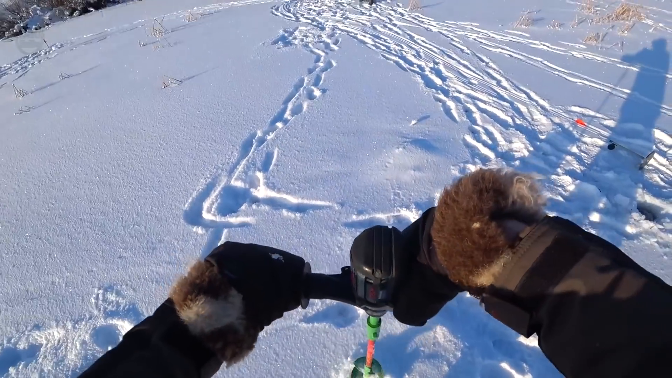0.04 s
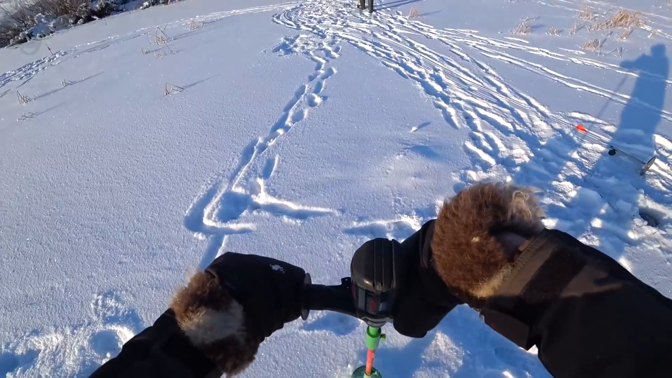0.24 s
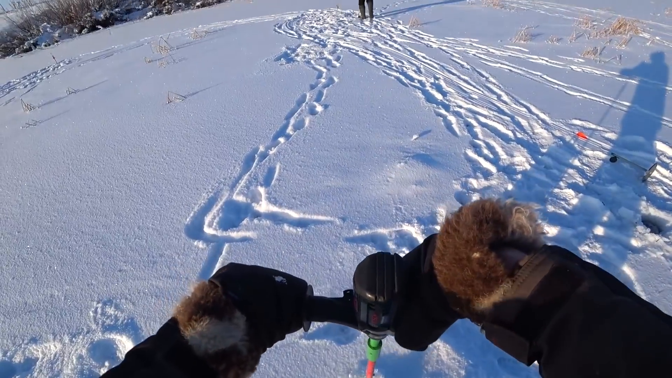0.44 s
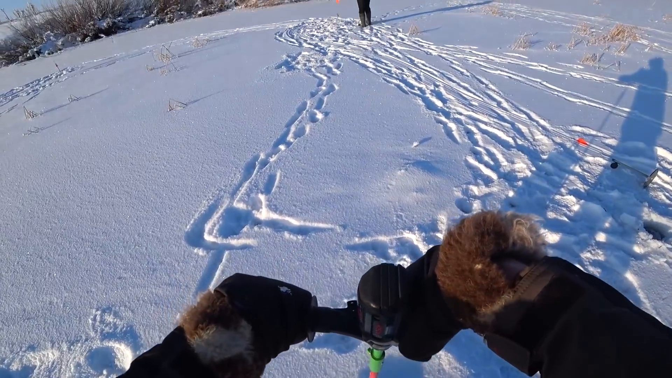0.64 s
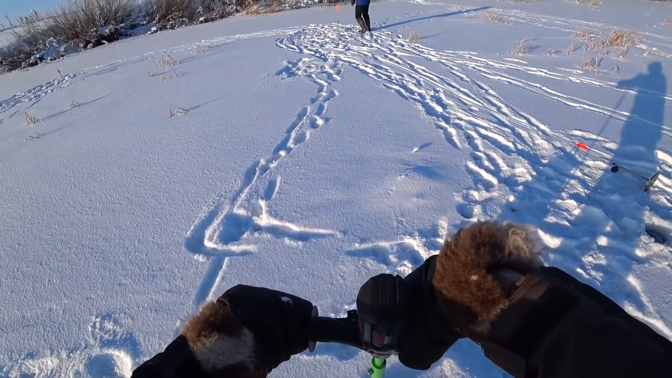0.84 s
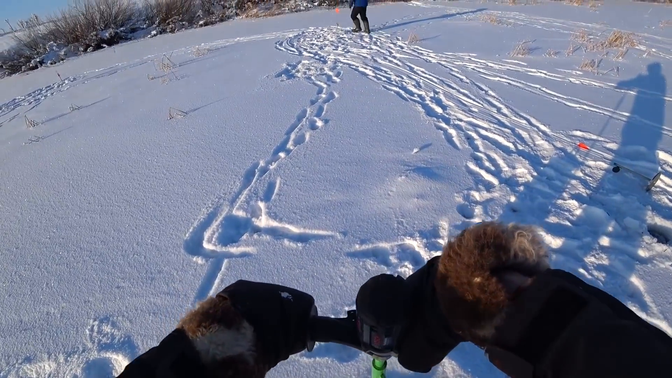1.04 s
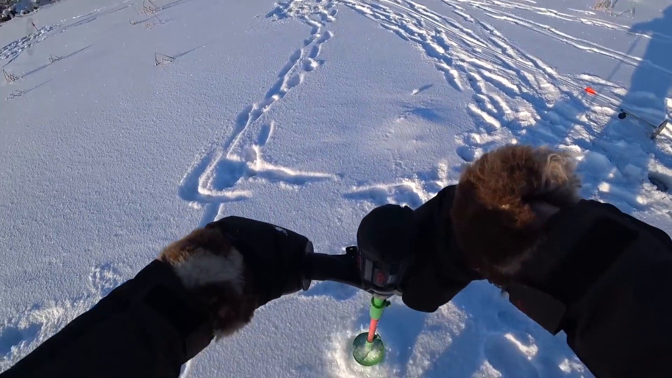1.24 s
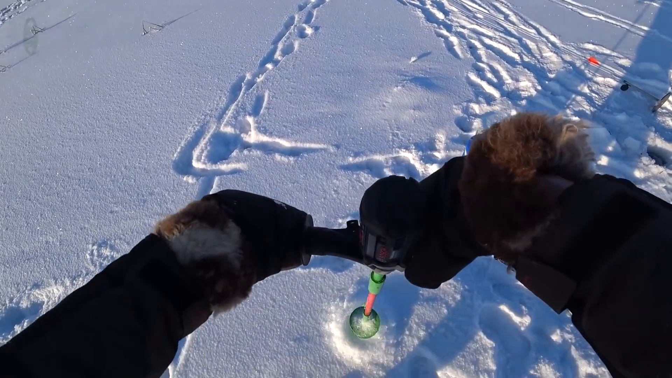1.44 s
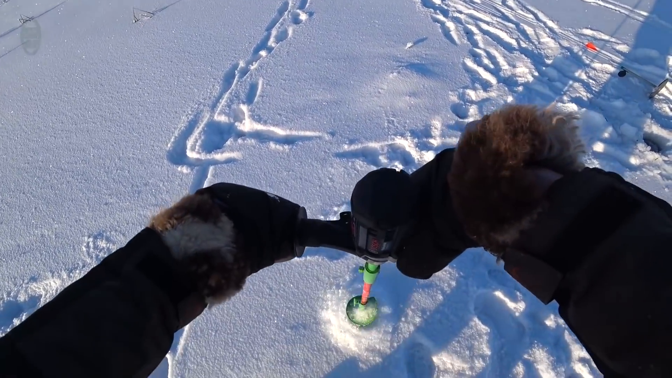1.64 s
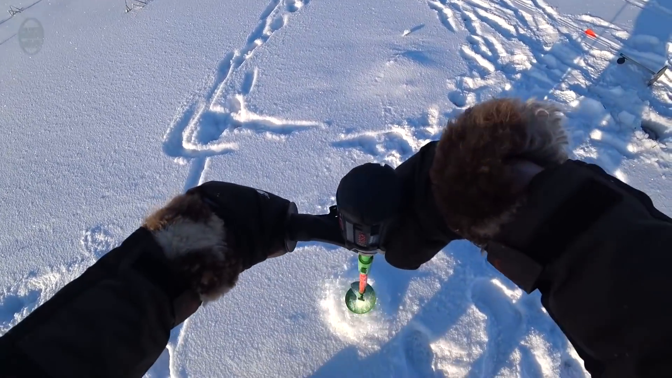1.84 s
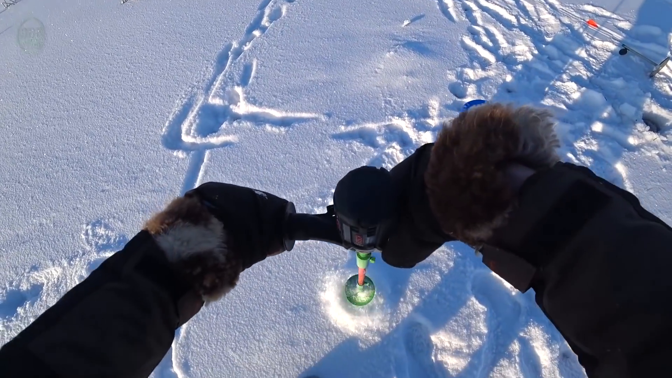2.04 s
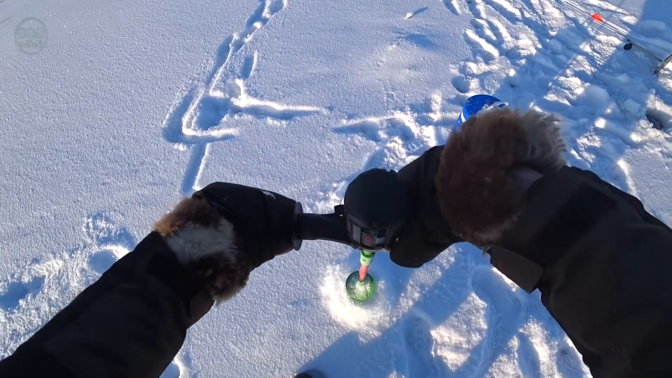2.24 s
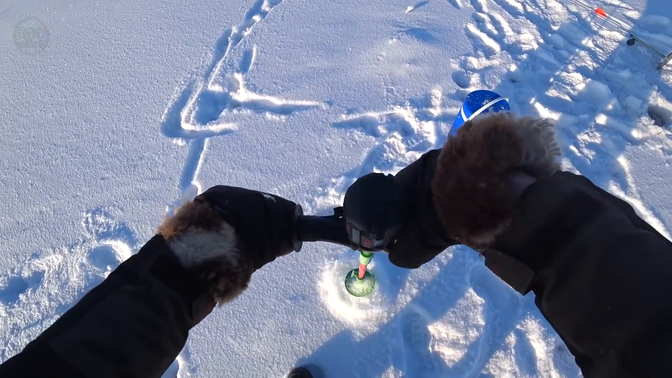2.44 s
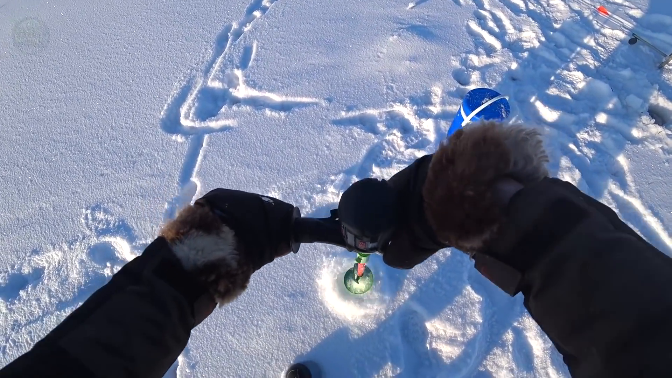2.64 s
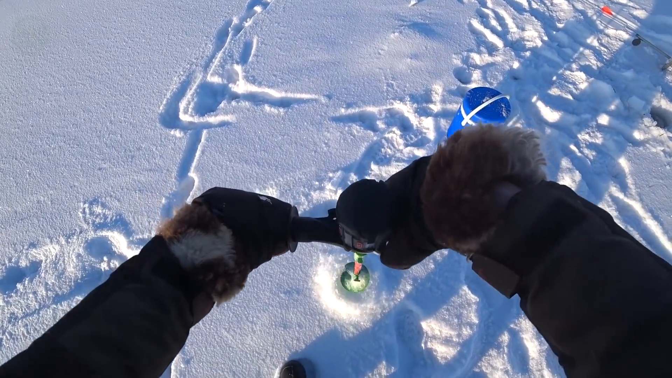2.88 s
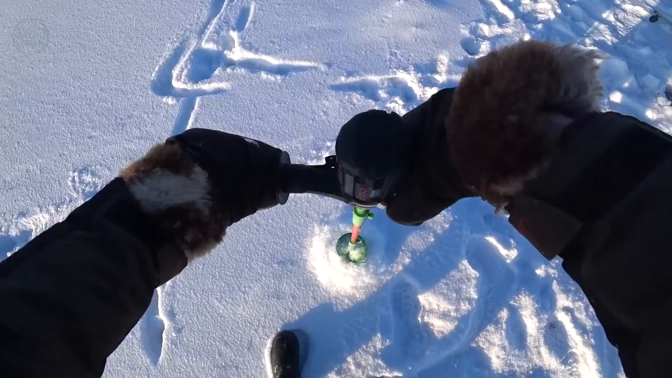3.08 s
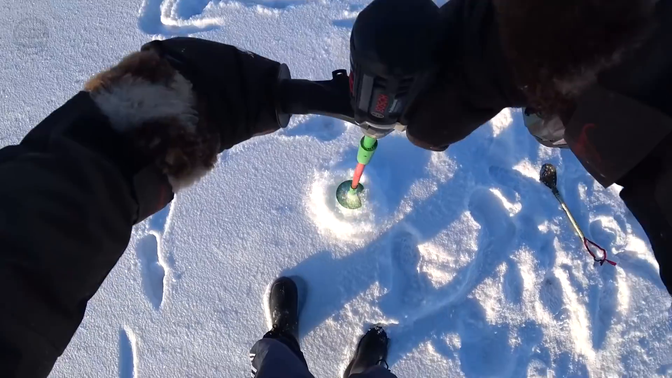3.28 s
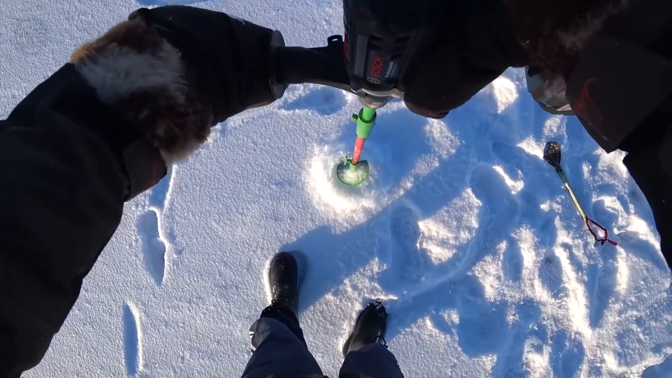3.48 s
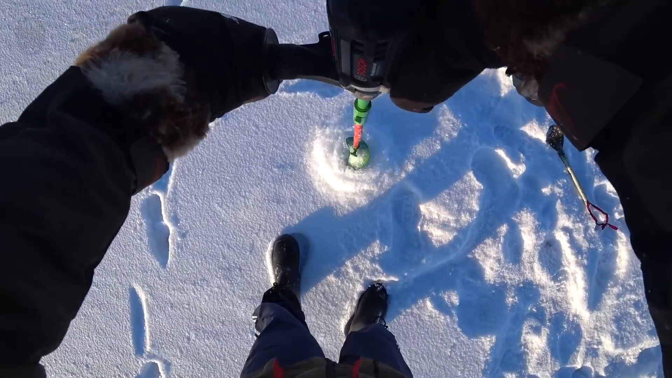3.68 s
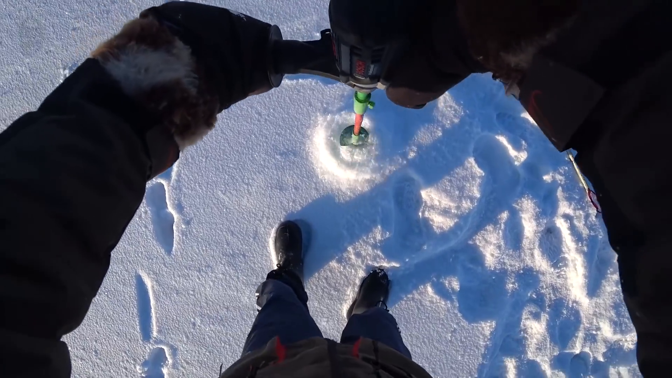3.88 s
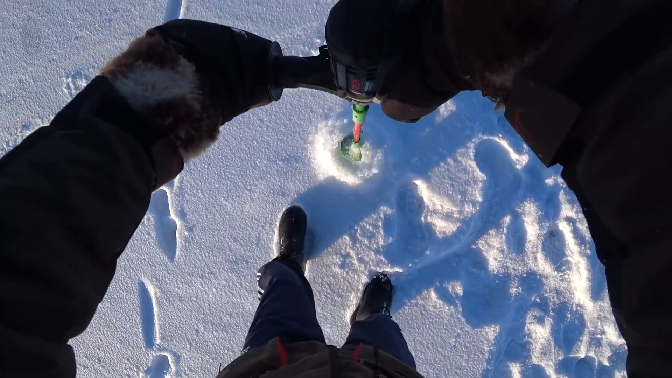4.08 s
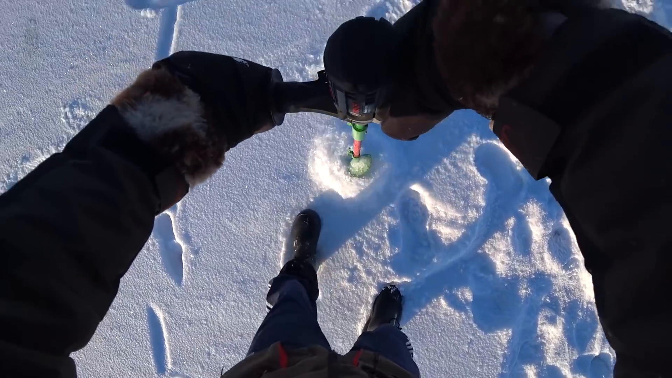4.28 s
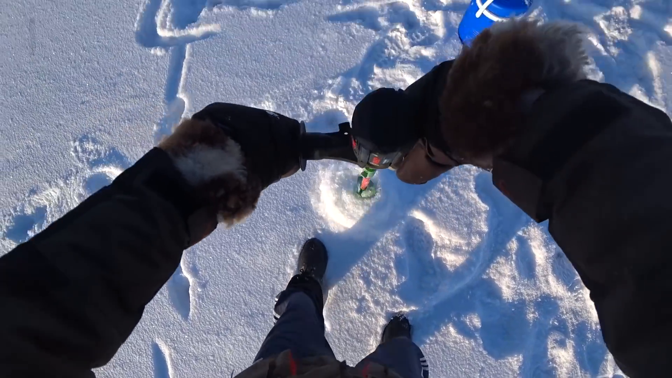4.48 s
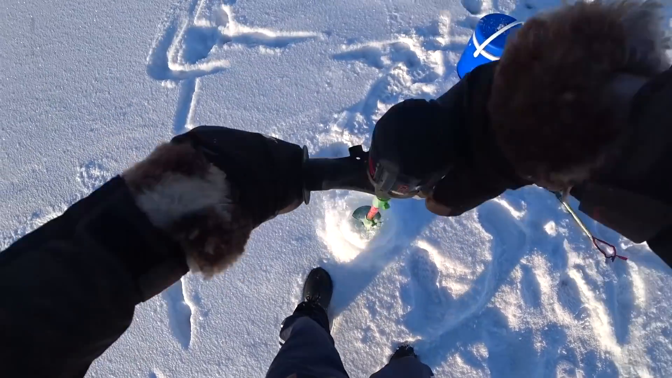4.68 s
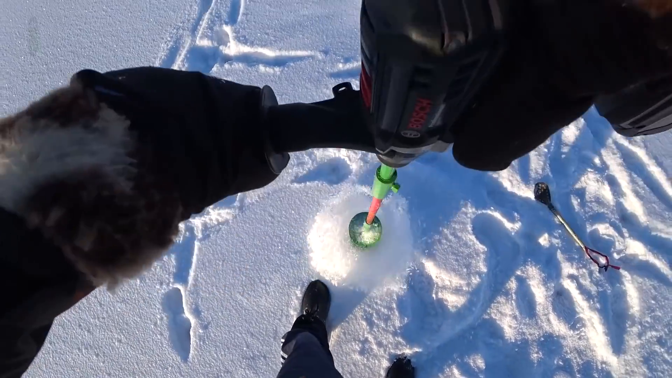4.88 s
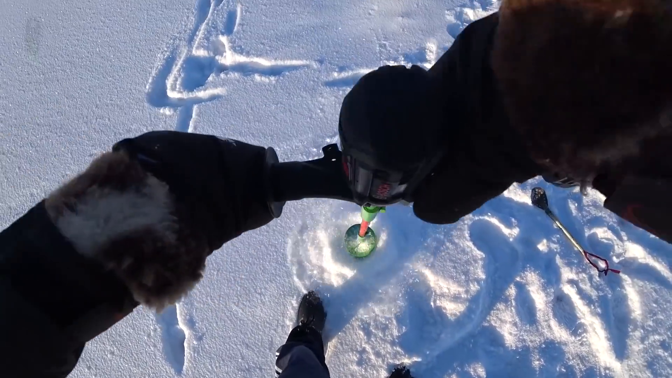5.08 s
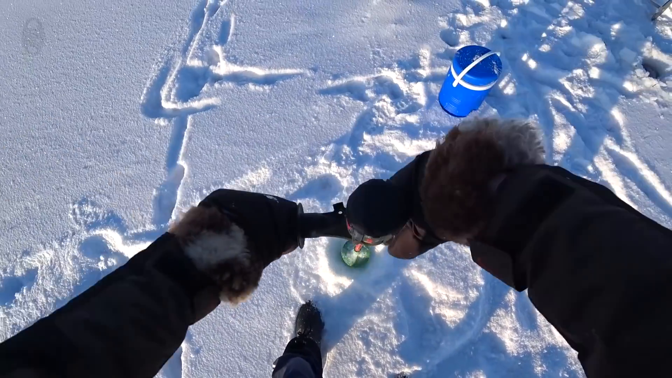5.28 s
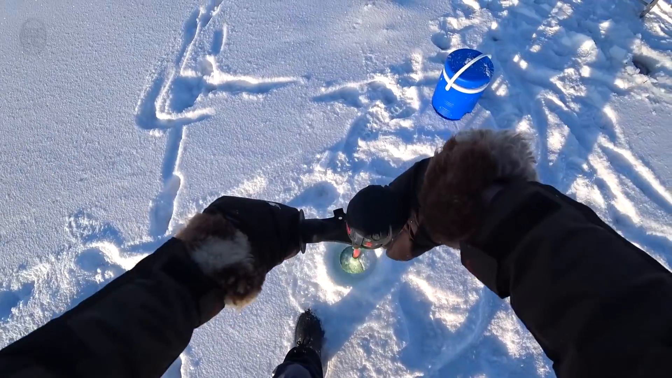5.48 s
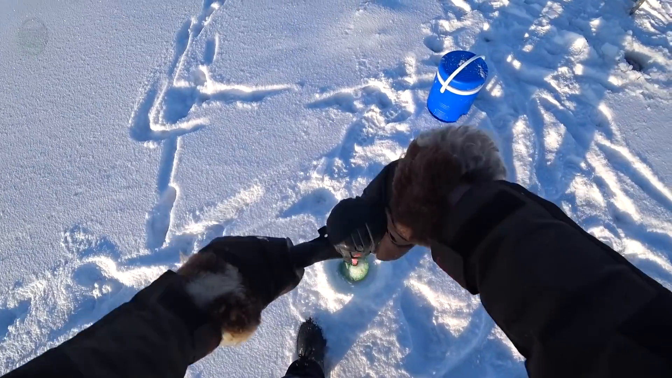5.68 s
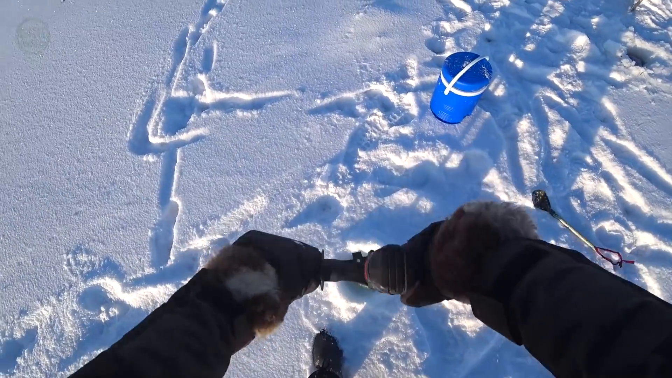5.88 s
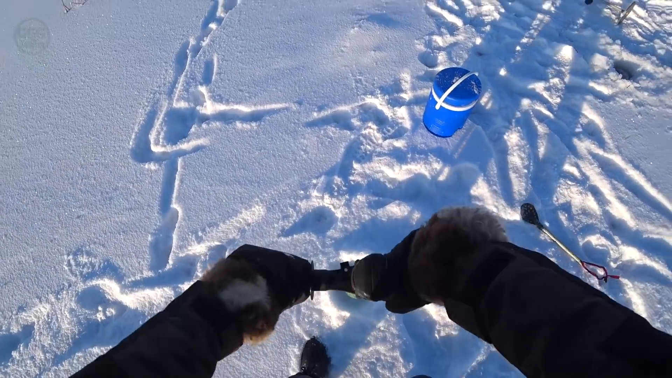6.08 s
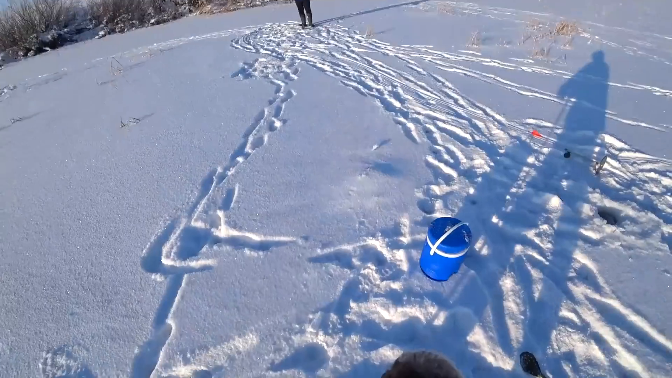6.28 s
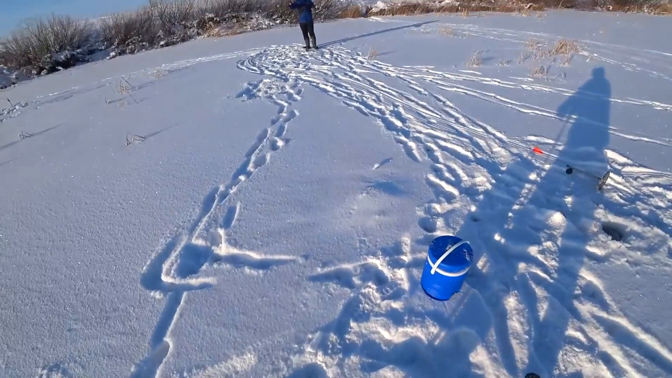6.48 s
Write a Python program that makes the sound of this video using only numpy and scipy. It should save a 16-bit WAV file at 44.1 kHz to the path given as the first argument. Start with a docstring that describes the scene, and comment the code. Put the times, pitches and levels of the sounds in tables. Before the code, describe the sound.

Close, rasping ice boring under a high gear whine; the pitch leaps up, falls back, and ends in clacks, wet slosh and sleeve rustle.

```python
"""Geared drill boring ice

A cordless drill drives an ice auger at arm's length: rotating gears whine as tones at multiples of the shaft
speed, and blades rasp as dense random fractures. The shaft races as the load lets go, bogs down again and fades.
Damped noise bursts are the knocks of auger and ice; clumped grains are slush and rustling sleeves.
Slow low-frequency noise is light wind and handle shudder; two ports hear it all with a phase difference.
"""
import sys
import numpy as np
from scipy import signal
from scipy.fft import rfft, irfft
from scipy.io import wavfile

SR = 44100
rng = np.random.default_rng(int(sys.argv[2]) if len(sys.argv) > 2 else 0)


def wav_out(sig):
    """Save sig, one row per channel (or a flat mono array), as 16-bit PCM at SR to the path in sys.argv[1]."""
    wavfile.write(sys.argv[1], SR, np.round(np.clip(np.atleast_2d(sig).T, -1, 1) * 32767).astype(np.int16))


N = 287964
TIME = np.arange(N) / SR  # s

# Wind gusts on the microphone: (time [s], length [s], level [dB])
WIND_GUSTS = [(.5, 0.81, -50), (1.35, .25, -48), (4.05, 0.26, -37), (4.42, 0.16, -36), (4.75, .18, -36),
              (5.26, 0.16, -30.5), (5.85, 0.57, -47)]
# Wind spectrum: (frequency [Hz], relative level [dB])
WIND_SPECTRUM = [(10, -3), (22, -0.5), (45, -8.5), (90, -13), (200, -55), (500, -57)]
# Jolts of the handle: (time [s], length [s], level [dB])
HANDLE_JOLTS = [(5.738, .05, -36.5), (6.01, .08, -46), (6.3, .1, -55)]
# Handle rumble spectrum: (frequency [Hz], relative level [dB])
HANDLE_SPECTRUM = [(40, -35), (90, -2), (135, 5.5), (200, -8), (400, -30.5)]
# Sleeve swishes: (time [s], length [s], level before SLUSH_TRIM_DB [dB])
SLEEVE_SWISHES = [(6.17, 0.09, -38), (6.27, 0.08, -33.5), (6.335, 0.057, -39), (6.435, .05, -47)]
# Wet slush spectrum: (frequency [Hz], relative level [dB])
SLUSH_SPECTRUM = [(100, -13), (250, -12), (450, -2), (1000, -10), (1700, -7), (2500, -7), (4000, -13),
                  (6500, -28), (11000, -31)]
# Sleeve cloth spectrum: (frequency [Hz], relative level [dB])
SLEEVE_SPECTRUM = [(100, -25), (200, -10), (600, -6), (1200, -15.5), (2200, -14), (3400, -8.5),
                   (5100, -24.5), (11000, -28)]
# Knocks of auger and ice: (time [s], level of the clack before decay [dB], low thud relative to it [dB],
# sharp snap relative to it [dB], time to decay by 60 dB [s])
ICE_KNOCKS = [(5.712, -22, 1, -7, 0.063), (5.727, -15, -14, -12, 0.11), (5.74, -19, -8, -14, 0.063),
              (5.754, -20, -7, -17, .02), (5.7998, -11, -23, -7, 0.014), (5.9073, -11, -11.5, -4.5, .013),
              (5.934, -19.5, -11, -13, 0.02), (5.954, -24, 8, -14, 0.016), (5.999, -27, 1, -17, 0.026),
              (6.02, -29, 9.5, -16, 0.035), (6.327, -26, -14, -1.5, 0.014),
              (6.343, -40.5, 10.5, -16, 0.059), (6.398, -31, -15, -19, 0.053), (6.445, -37, -11, -18, .03),
              (6.47, -40.5, 5, -14, .03)]
# Spectra of the three parts of a knock: (frequency [Hz], relative level [dB])
THUD_SPECTRUM = [(50, -11), (130, 2.0), (600, 0), (1400, -9), (3000, -40)]
CLACK_SPECTRUM = [(500, -31), (1500, -1), (2500, 0.5), (4200, 0.5), (6000, -35), (11000, -37)]
SNAP_SPECTRUM = [(2500, -27), (4500, 0.5), (8500, -1), (11000, 0), (13000, -40)]
# Grinding, one row each for upright, leaning and running light:
# (level [dB], low scrape relative to it [dB], hiss of chips relative to it [dB])
GRINDING_BALANCE = [(-17.5, -14.3, -14.8), (-19, -17.5, -9.0), (-22, -17, -6)]
# Grinding spectrum under load, body upright: (frequency [Hz], relative level [dB])
UPRIGHT_SPECTRUM = [(150, -31.5), (235, -32.5), (320, -13), (450, -8.5), (560, -19.5), (660, -13),
                    (1630, -11), (2500, 1.5), (3240, -5.5), (3720, -5.5), (4420, -12), (6400, -20),
                    (7050, -27.5), (8200, -16), (9100, -26), (10100, -18.5), (11000, -27.5)]
# Grinding spectrum under load, leaning over the drill: (frequency [Hz], relative level [dB])
LEANING_SPECTRUM = [(180, -23.5), (240, -24), (340, -12.5), (620, -16.5), (820, -21), (1350, -7.5),
                    (2100, -7.5), (2500, -2.5), (3050, -3.5), (3650, 0.5), (4300, -7), (5900, -11),
                    (7000, -21), (8100, -16), (11000, -25)]
# Grinding spectrum with the blades running light: (frequency [Hz], relative level [dB])
LIGHT_SPECTRUM = [(180, -17.5), (450, -6.5), (1000, -5.5), (1500, -6.5), (2100, -4.5), (2700, -2.5),
                  (3500, -3.5), (4300, -10), (5700, -5.5), (7300, -18), (9100, -9), (9900, -12.5),
                  (11000, -15)]
# Resonances of housing and auger, under load and upright: (frequency [Hz], width [Hz], boost [dB])
HOUSING_RINGS = [(2370, 91, 2.5), (2530, 130, 0.5), (3720, 88, 5.5)]
# The freed auger brushes the wall of the hole:
# (time [s], length [s], extra grinding [dB], extra low scrape [dB])
WALL_BRUSHES = [(5.117, 0.14, 1.5, 0), (5.25, 0.24, 0, 6.5), (5.403, 0.25, 0.8, -5.5)]
# Motor shaft speed: (time [s], speed [turns/s])
SHAFT_SPEED = [(0, 258), (1.25, 256.3), (1.95, 250.3), (4.27, 248.3), (4.36, 244), (4.45, 250), (4.6, 253),
               (4.64, 269), (4.69, 282), (4.82, 295), (4.97, 300), (5.02, 296), (5.32, 305), (5.38, 288),
               (5.44, 281), (5.56, 259), (5.7, 252), (5.78, 196), (5.9, 176), (6.05, 110)]
# Pull of the blades: (time [s], load [0-1])
BLADE_LOAD = [(0, 0.99), (4.2, 0.91), (4.59, 0.94), (4.66, 0.24), (4.85, 0), (5.3, 0.15), (5.44, 0.32),
              (5.56, 0.89), (5.7, 0.9), (5.8, 0.3)]
# How far the body leans over the drill: (time [s], lean [0-1])
BODY_LEAN = [(0, 0.13), (1.15, 0.17), (1.3, 0.45), (2.4, .56), (2.92, 0.5), (3.12, 0.86), (3.85, 0.95),
             (4.5, 0.82), (5.4, 0.95), (5.65, 0.5)]
# Strong gear meshes: (multiple of shaft speed, roughness before load scaling [0-1], level under load
# upright [dB], half leaning [dB], fully leaning [dB], level running light [dB], level coasting [dB],
# resonance in which the mesh sings [Hz], its width [Hz], its boost [dB])
GEAR_MESHES = [(11.41, 0.26, -46, -25.5, -19, -50, -60, 2900, 47, 3),
               (10, 0.37, -30, -34, -29.5, -34, -30.5, 2995, 205, 12),
               (15, 0.38, -38.5, -31, -40, -38.5, -58, 4236, 600, 16.5),
               (2.39, 0.47, -56, -44.5, -38, -57, -40, 657, 75, 13)]
# One rough mesh: (multiple of shaft speed, roughness before load scaling [0-1], level under load
# upright [dB], leaning [dB], level running light [dB])
ROUGH_MESH = (14.05, 0.45, -27.5, -31, -38)
# Weaker orders of motor and gearbox: (multiple of shaft speed, level under load before shading [dB],
# level running light before shading [dB])
WEAK_ORDERS = [(0.997, -59.5, -46), (2.623, -44.5, -59), (4, -47, -54), (5.016, -46, -33),
               (5.95, -41.5, -38), (10.3, -37, -53), (12.72, -41, -35), (15.6, -67, -33), (17.5, -59, -36),
               (20.04, -71, -31), (21.47, -41.5, -63), (21.8, -61, -38), (23.27, -40.5, -49),
               (26.35, -46, -55), (29.93, -59, -33.5), (30.24, -46.5, -44), (31, -58, -47)]
# Phase between the two ports: (frequency [Hz], lead of the left port [rad])
PORT_LEAD = [(100, -0.08), (280, -0.55), (600, -1.02), (1100, -1.2), (2800, -0.76), (5000, -.5),
             (6900, -0.65), (9200, -0.15)]

BREEZE_DB, SHUDDER_DB = -53.5, -49  # steady wind, and the handle while the motor drives
RELEASE_S, RELEASE_FADE_S = 5.72, 0.043  # the trigger is let go and the blades stop cutting
SHUDDER_FADE_S = 0.25  # the handle calms down after the release
RUN_ON_S, RUN_ON_LENGTH_S = 5.85, 0.068  # the slack gears whistle once more as they coast
CHURN_DB, SLEEVE_REST_DB, SLUSH_TRIM_DB = -27.5, -47.5, -1.0  # the trim is added to the other two
CHURN_END_S, SETTLE_DB_PER_S = 6.01, 157  # slush churns evenly until the auger rests, then settles
SLUSH_TONE, SLEEVE_TONE = (-11, -15), (-4.1, -14.5)  # dB of (low slosh, fizz) relative to the middle
FLUTTER_DB = 0.74  # rms waver of the whine as the teeth bear unevenly
PORT_BALANCE_DB = -0.74  # left minus right
EDGE_HZ = 11150  # upper band limit


def amp(db):
    """Level law: converts decibels to an amplitude ratio."""
    return 10 ** (np.asarray(db) / 20)


def unit(x):
    """Normalisation: scales a signal to rms 1."""
    return x / np.sqrt(np.mean(abs(x) ** 2) + 1e-20)


def curve(rows, t):
    """Linear interpolation: reads a control curve over time."""
    return np.interp(t, *np.transpose(rows))


def colour(points, hz):
    """Logarithmic frequency scale: interpolates a spectrum along it."""
    f, value = np.transpose(points)
    return np.interp(np.log(hz + 1), np.log(f + 1), value)


def ramp(t, start, length):
    """Linear transition: goes from 0 to 1 over the given stretch."""
    return np.clip((t - start) / length, 0, 1)


def bell(t, s, length):
    """Gaussian pulse: rises and falls around s, above half height for the given length."""
    return 0.5 ** ((2 * (t - s) / length) ** 2)


def swells(rows, t, floor):
    """Addition of powers: incoherent swells combine over a floor."""
    power = sum((amp(db) * bell(t, s, length)) ** 2 for s, length, db in rows)
    return np.sqrt(floor ** 2 + power)


def wander(rate_hz):
    """Low-passed randomness: smooth chance motion of rms 1, up to about the given rate."""
    t = TIME[::64]  # slow motion needs only a coarse time grid
    hz = np.fft.rfftfreq(len(t), t[1])
    spectrum = rfft(rng.standard_normal(len(t))) * np.exp(-(hz / rate_hz) ** 2)
    return np.interp(TIME, t, unit(irfft(spectrum, len(t))))


def noise(points):
    """Spectral shaping: filters white noise to a steady colour of rms 1."""
    gain = amp(colour(points, np.fft.rfftfreq(N, 1 / SR)))
    return unit(irfft(rfft(rng.standard_normal(N)) * gain, N))


def grains(per_s, spread_db):
    """Random impulse process: tiny fractures, a few much larger than the rest."""
    size = amp(spread_db * np.minimum(rng.exponential(1, N), 4))
    sign = rng.choice([-1, 1], N)
    return unit(size * sign * (rng.random(N) < per_s / SR))


def band_db(gain, hz, low_hz, high_hz):
    """Band power: sums the squared gain within a band, in dB."""
    inside = (hz > low_hz) & (hz < high_hz)
    return 10 * np.log10((gain[inside] ** 2).sum(0) / len(hz))


def voiced(drive, shape, levels):
    """Source-filter principle: a moving spectrum colours a drive, with set middle, lows and highs."""
    hz, t, z = signal.stft(unit(drive), SR, nperseg=512, noverlap=384)
    gain = amp(shape(hz[:, None], t))
    mid = band_db(gain, hz, 1200, 4500)
    low = band_db(gain, hz, 250, 1000)
    high = band_db(gain, hz, 4800, 11000)
    lows = np.interp(hz, [850, 1350], [1, 0])[:, None]
    highs = np.interp(hz, [4100, 5000], [0, 1])[:, None]
    level_db, low_db, high_db = levels(t)
    # lows and highs are placed relative to the middle band
    db = level_db - mid + lows * (low_db + mid - low) + highs * (high_db + mid - high)
    return signal.istft(z * gain * amp(db), SR, nperseg=512, noverlap=384)[1][:N]


def effort(t):
    """Operating state: load on the blades and lean of the body, both 0 to 1."""
    return np.clip(curve(BLADE_LOAD, t), 0, 1), np.clip(curve(BODY_LEAN, t), 0, 1)


def rumble():
    """Low-frequency pressure noise: gusts on the microphone and the shudder of the handle."""
    wind = swells(WIND_GUSTS, TIME, amp(BREEZE_DB)) * amp(2.9 * wander(19))
    shudder = amp(SHUDDER_DB) * (1 - ramp(TIME, RELEASE_S, SHUDDER_FADE_S))
    handle = swells(HANDLE_JOLTS, TIME, shudder)
    return wind * noise(WIND_SPECTRUM) + handle * noise(HANDLE_SPECTRUM)


def slush_colour(hz, t):
    """Spectral cross-fade: wet churning gives way to the swish of sleeves."""
    settled = np.interp(t, [6.03, 6.14], [0, 1])
    return (1 - settled) * colour(SLUSH_SPECTRUM, hz) + settled * colour(SLEEVE_SPECTRUM, hz)


def slush_levels(t):
    """Exponential settling: churning holds, then dies away; the sleeves swish after it."""
    churn = amp(CHURN_DB - SETTLE_DB_PER_S * np.maximum(t - CHURN_END_S, 0))
    gain = swells(SLEEVE_SWISHES, t, np.hypot(churn, amp(SLEEVE_REST_DB)))
    settled = ramp(t, CHURN_END_S, 0.032)
    low_db, high_db = ((1 - settled) * wet + settled * dry for wet, dry in zip(SLUSH_TONE, SLEEVE_TONE))
    return 20 * np.log10(gain), low_db, high_db


def slush():
    """Clumped impulse noise: coarse grains as the auger coasts and is let down, then sleeves."""
    drive = grains(per_s=2600, spread_db=1.5) + 0.75 * rng.standard_normal(N)
    clumped = drive * amp(1.7 * wander(66))
    wet = voiced(clumped, slush_colour, slush_levels)
    return amp(SLUSH_TRIM_DB) * wet * ramp(TIME, RELEASE_S, RELEASE_FADE_S)


def knocks():
    """Damped impact: each blow decays exponentially as a thud, a housing clack and an ice snap."""
    out, t = np.zeros(N), np.arange(SR // 8) / SR
    thud, clack, snap = noise(THUD_SPECTRUM), noise(CLACK_SPECTRUM), noise(SNAP_SPECTRUM)
    for s, db, thud_db, snap_db, t60 in ICE_KNOCKS:
        onset = 1 - np.exp(-t / 0.0004)
        blow = amp(db - 60 * t / t60) * onset
        envelope = np.interp(TIME - s, t, blow, left=0, right=0)
        out += envelope * (clack + amp(thud_db) * thud + amp(snap_db) * snap)
    return out


def grinding_colour(hz, t):
    """Resonance and path: load and lean blend the spectra, with rings when loaded and upright."""
    load, lean = effort(t)
    rings = sum(db / (1 + (2 * (hz - f) / width) ** 2) for f, width, db in HOUSING_RINGS)
    upright = colour(UPRIGHT_SPECTRUM, hz) + rings
    loaded = (1 - lean) * upright + lean * colour(LEANING_SPECTRUM, hz)
    return load * loaded + (1 - load) * colour(LIGHT_SPECTRUM, hz)


def grinding_levels(t):
    """Power rises with load; leaning in brings the hiss of chips closer, and wall contact adds to it."""
    load, lean = effort(t)
    upright, leaning, light = np.array(GRINDING_BALANCE)[:, :, None]
    loaded = (1 - lean) * upright + lean * leaning
    level_db, low_db, high_db = load * loaded + (1 - load) * light
    for s, length, extra_db, scrape_db in WALL_BRUSHES:
        contact = bell(t, s, length)
        level_db, low_db = level_db + extra_db * contact, low_db + scrape_db * contact
    return level_db, low_db, high_db


def grinding(turns, rattle):
    """Amplitude-modulated fracture noise: blades shave ice, pulsing faintly with the shaft."""
    drive = grains(per_s=12000, spread_db=2.5) + 0.58 * rng.standard_normal(N)
    drive = drive * amp(0.48 * np.cos(2 * np.pi * turns) + rattle)
    cutting = 1 - ramp(TIME, RELEASE_S, RELEASE_FADE_S)
    return voiced(drive, grinding_colour, grinding_levels) * cutting


def gear_line(turns, order, rough):
    """Tooth-mesh tone: a steady core plus a skirt blurred by uneven tooth contact."""
    blur = unit(wander(45) + 1j * wander(50))
    rough = np.clip(rough, 0, 1)
    envelope = np.sqrt(1 - rough ** 2) + rough * blur
    return np.sqrt(2) * (envelope * np.exp(2j * np.pi * order * turns)).real


def gears(turns, load):
    """Order principle: all tones ride on one shaft, while load and lean shift their balance."""
    speed, lean = curve(SHAFT_SPEED, TIME), effort(TIME)[1]
    driving = 1 - ramp(TIME, RELEASE_S, RELEASE_FADE_S)
    run_on = bell(TIME, RUN_ON_S, RUN_ON_LENGTH_S)
    steady = 0.75 + 0.5 * load  # roughness factor: free gears run more cleanly
    strong = 0
    for (order, rough, upright_db, half_db, leaning_db, light_db, coast_db,
         ring_hz, width_hz, ring_db) in GEAR_MESHES:
        loaded_db = np.interp(lean, [0, 0.5, 1], [upright_db, half_db, leaning_db])
        singing = 0.5 ** ((2 * (order * speed - ring_hz) / width_hz) ** 4)
        driven_db = load * loaded_db + (1 - load) * light_db
        driven_db = driven_db + ring_db * singing + FLUTTER_DB * wander(9.7)
        gain = driving * amp(driven_db) + run_on * amp(coast_db)
        strong = strong + gain * gear_line(turns, order, rough * steady)
    order, rough, upright_db, leaning_db, light_db = ROUGH_MESH
    loaded_db = (1 - lean) * upright_db + lean * leaning_db
    rough_db = load * loaded_db + (1 - load) * light_db
    weak = amp(rough_db) * gear_line(turns, order, rough * steady)
    shade_db = np.minimum(lean - 0.5, 0) * 16  # high overtones are shaded until the body leans in
    for order, loaded_db, light_db in WEAK_ORDERS:
        db = load * loaded_db + (1 - load) * light_db + shade_db * order / 25
        weak = weak + amp(db) * gear_line(turns, order, rough=0.34 + order / 50)  # higher is rougher
    return strong + weak * driving


def ports(direct, scattered):
    """Interaural-like phase: direct sound reaches two ports out of phase; scattered sound differs."""
    half = np.clip(colour(PORT_LEAD, np.fft.rfftfreq(N, 1 / SR)), -2, 2) / 2
    side = irfft(1j * np.tan(half) * rfft(direct), N) + scattered
    tilt = amp(PORT_BALANCE_DB / 2)
    return np.array([(direct + side) * tilt, (direct - side) / tilt])


def scene():
    """Superposition: the shaft speed trembles as the blades catch; all sources add at two ports."""
    load = effort(TIME)[0]
    tremble = 0.0013 * wander(22) + 0.0012 * wander(150)
    turns = np.cumsum(curve(SHAFT_SPEED, TIME) * (1 + tremble)) / SR
    rattle = (0.5 + 1.27 * (1 - load)) * wander(26)  # dB; slack gears rattle in bursts
    direct = rumble() + slush() + knocks() + grinding(turns, rattle) + gears(turns, load)
    # fresh random draws make the scattered sound independent of the direct sound
    scattered = amp(-18) * rumble() + amp(-9.5) * (slush() + grinding(turns, rattle))
    return ports(direct, scattered)


def record(dry):
    """Saturation and band limiting: the highest peaks are rounded off, then low-pass filtered."""
    rounded = dry / (1 + (dry / 0.7) ** 4) ** 0.25
    low_pass = signal.firwin(801, EDGE_HZ, window=("kaiser", 9), fs=SR)
    return signal.oaconvolve(rounded, low_pass[None], "same")


dry = scene()
out = record(dry)
wav_out(out)
```